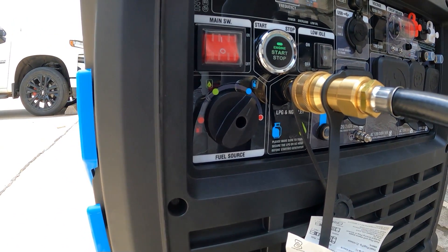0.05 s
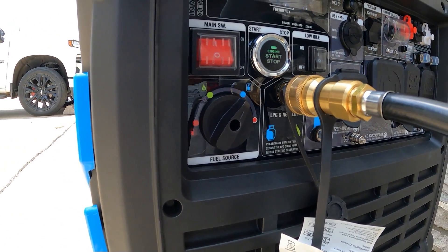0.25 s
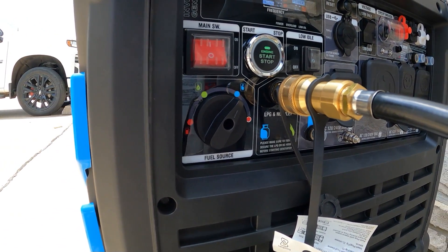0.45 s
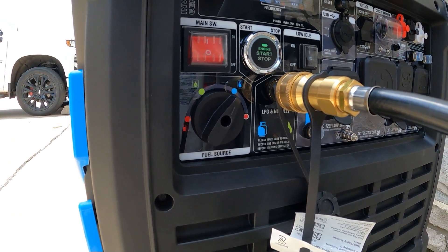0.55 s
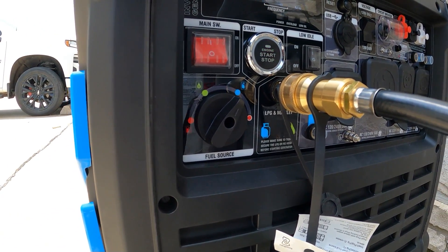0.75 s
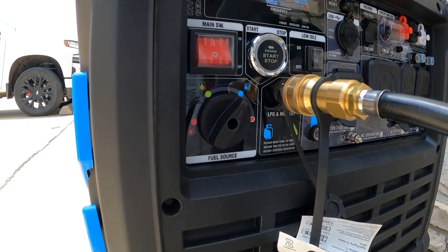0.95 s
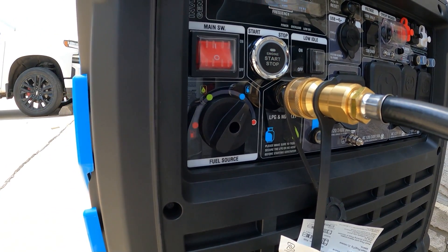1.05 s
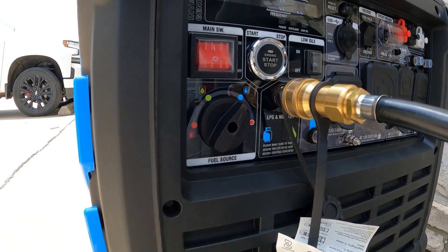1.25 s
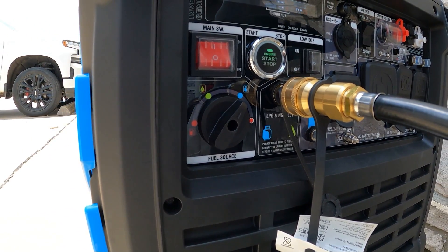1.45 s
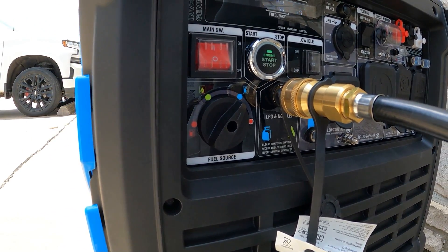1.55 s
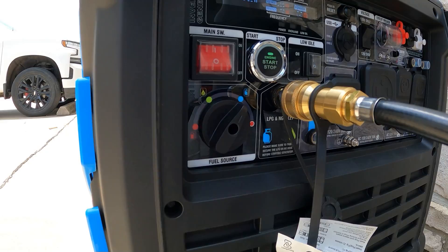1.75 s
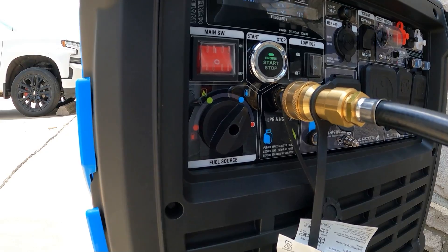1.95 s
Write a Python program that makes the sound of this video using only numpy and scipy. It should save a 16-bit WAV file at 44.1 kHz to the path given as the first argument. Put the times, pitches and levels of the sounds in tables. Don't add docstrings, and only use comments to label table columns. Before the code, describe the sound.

Faint hiss until about 0.22 s, then a loud metallic clunk with short chatter. An electric starter growls slowly from 0.3 s, its coarse gear whine rising quickly until 0.7 s and levelling by 1 s. Each compression drags it, ending in a soft low thump, roughly every 0.2 s. From 1.45 s the grinding eases, fading towards 2 s without the engine catching. Close, dry, right side only.

```python
import sys
import numpy as np
from scipy import signal
from scipy.fft import rfft, irfft
from scipy.io import wavfile

SR = 44100
rng = np.random.default_rng(int(sys.argv[2]) if len(sys.argv) > 2 else 0)


def amplitude_ratio(level_db):
    exponent = np.asarray(level_db, float) / 20
    return 10 ** exponent


def persist_wave(psi):
    counts = np.round(np.clip(psi, -1, 1) * 32767).astype(np.int16)
    wavfile.write(sys.argv[1], SR, np.atleast_2d(counts).T)


N = 88200

# t/s, level/dB, f/Hz
THUMPS = [
    (0.406, -25.5, 98.6),
    (0.671, -26.5, 104.8),
    (0.887, -25.5, 103.4),
    (1.095, -25.5, 107.2),
    (1.299, -25.5, 104.7),
    (1.5, -26, 106),
    (1.703, -27.5, 107.6),
    (1.903, -29.5, 106),
]
# f/Hz, bandwidth/Hz, level/dB, change once the strain eases/dB
PANELS = [(65, 30, -22, 1), (265.5, 71, -11, 11.5), (490, 47, -31, 8), (551.4, 26, -11.5, -13),
          (684, 46, -5, -7), (732, 66.6, 0, 1.5), (841.3, 40.5, -1, 3)]
# f/Hz, bandwidth/Hz, level/dB, change once the strain eases/dB
HOUSING = [(196.2, 3.97, -1.5, 11), (1127.5, 43, -0.5, 8), (1201, 36, -4.5, 6.5), (1290, 22, -5, -12),
           (1529, 26, -2, -10.5), (1750, 100, -12, 2.5), (2361.5, 32, 1.5, 1.5), (2469, 79, -1.5, 2.5),
           (3054, 52, -10, -26), (3515, 75, 2, 5), (3567, 114, -1.5, 5), (4360, 86, -4, -5.5),
           (5240, 148, -7.5, 5)]
# t/s, level/dB, brightness/dB
BLOWS = [(.216, -35, -2), (0.2238, -22, -7), (0.2272, -12.5, -8), (0.2305, -13.5, -10), (0.2338, -14, 8.5),
         (.2357, -1, -9), (0.2406, -5, -10), (0.2463, -13, -12), (.253, -17.5, -9), (0.26, -16.5, -34),
         (0.2663, -20.5, -33), (.271, -16, -41), (0.283, -20, -46), (0.299, -22, -24), (.315, -24, -31)]


def starter():
    # t/s, mesh f/Hz, effort level/dB, panel level/dB, whine level/dB
    run_up = [(0.301, 284.7, -40, -31, -64), (.333, 290.2, -33.5, -51, -34.5),
              (.395, 298.2, -32, -42, -34.5), (.42, 332, -31.5, -43, -44), (.456, 394.1, -30.5, -36, -32),
              (.5, 434.6, -31.5, -30.5, -27), (.568, 494.2, -27.5, -31.5, -27),
              (.64, 516.1, -27, -24, -31.5), (.71, 536.6, -27, -37.5, -25.5),
              (.8, 561.9, -27.5, -26.5, -32), (1.0, 596.6, -26, -29.5, -34.5),
              (1.2, 605.6, -26.5, -25.5, -38.5), (1.33, 610, -26.5, -30, -35.5), (1.45, 615, -28, -28, -32),
              (1.5, 606.4, -30.5, -42, -38.5), (1.6, 606.8, -31.5, -47.5, -36.5),
              (1.8, 615, -34.5, -45.5, -39), (2.0, 620, -40.5, -52.5, -42.5)]
    # f/Hz, bandwidth/Hz, level/dB, change once the strain eases/dB
    casing = [(5896, 77, -13.5, 5), (6425, 130, -15.5, 3.5), (6730, 120, -29, 12), (6980, 75, -14, 4.5),
              (7650, 650, -23, 3), (8370, 400, -38, 4), (10900, 520, -26.5, -8)]
    t = np.arange(N) / SR
    s, *rows = np.transpose(run_up)
    mesh, effort_db, panel_db, whine_db = (np.interp(t, s, row) for row in rows)
    press, slack = compression(t)
    speed = mesh * (1 - .085 * press) * (1 + .004 * drift(per_s=40))
    turns = np.cumsum(speed) / SR
    shaft = np.cos(2 * np.pi * turns / 8)
    slow = np.clip(1 - (t - 0.35) / 0.14, 0, 1)
    eased = np.clip((t - 1.461) / 0.07, 0, 1)

    whine = gear_whine(mesh, turns) * amplitude_ratio(whine_db + 0.44 * shaft + 2.7 * press - 2.4 * slack)
    knocks = tooth_knocks(turns, shaft)
    housing = evened(body(knocks, HOUSING + casing, eased)) * amplitude_ratio(-6 * slow)
    housing *= amplitude_ratio(effort_db + 1.6 * press - 8.56 * slack)
    panels = evened(body(knocks, PANELS, eased))
    panels *= amplitude_ratio(panel_db + 4.5 * press - 0.84 * slack)
    fizz = brush_fizz(slow, eased, press, slack) * amplitude_ratio(effort_db)
    onset = np.clip((t - .225) / 0.0071, 0, 1)
    return np.sqrt(2) * onset * (housing + panels + fizz + whine)


def compression(t):
    at = np.array(THUMPS)[:, 0]
    at = np.r_[at[0] - .33, at, 2 * at[-1] - at[-2]]
    left = 1 - np.interp(t, at, np.arange(len(at))) % 1
    press = np.exp(-((left - .28) / .06) ** 2)
    slack = np.exp(-((left - 0.19) / 0.038) ** 2)
    return press, slack


def gear_whine(mesh, turns):
    # multiple of mesh, level/dB, level through resonances/dB, climb/(dB/octave), wander/dB
    orders = [(.312, -59, 2, 52, 2.5), (1, -3, -18, 8.5, 3.5), (1.5, -36, 0, -23, 3), (2, -47, -36, 0, 12),
              (3, -14, -4, -5, 6.5), (4.5, -10, 3, -15, 3),
              (9, -29, -24, -22, 4), (13.5, -30, -26, -20, 4), (18, -35, -30, -18, 4),
                 (22.5, -38, -30, -23, 4)]
    whine = np.zeros(N)
    for k, db, ring_db, climb_db, wander_db in orders:
        response = 0
        for n, (f, width, level_db, _) in enumerate(PANELS + HOUSING):
            response = response + (-1) ** n * amplitude_ratio(level_db) / (1 + 2j * (k * mesh - f) / (0.65 * width))
        level = amplitude_ratio(db) + amplitude_ratio(ring_db) * abs(response)
        level = level * amplitude_ratio(climb_db * np.log2(mesh / 540) + wander_db * drift(per_s=22))
        jitter = min(k, 7) * 0.027 * drift(per_s=91)
        whine += level * np.cos(2 * np.pi * (k * turns + jitter + rng.random()))
    return whine


def tooth_knocks(turns, shaft):
    teeth = np.diff(np.floor(turns + .12 * drift(per_s=300)), prepend=0) > 0
    hits = teeth | (rng.random(N) < 700 / SR)
    spread_db = 3.5 * np.minimum(rng.exponential(1, N), 4)
    knocks = evened(hits * rng.choice([-1., 1.], N) * amplitude_ratio(spread_db))
    return (knocks + 0.85 * rng.standard_normal(N)) * amplitude_ratio(1.44 * shaft)


def brush_fizz(slow, eased, press, slack):
    # f/Hz, level/(dB/Hz)
    strained_bands = [(24, -22), (40, 5), (577, -10.5), (637, -28), (838, -5), (2060, -13.5), (2390, -7),
                      (5170, -19.5), (15500, -30.5)]
    # f/Hz, level/(dB/Hz)
    slow_bands = [(24, -52), (40, -15), (143, 10.5), (973, -18.5), (1280, 1.5), (1450, -13.5),
                  (2390, -13.5), (15500, -43)]
    # f/Hz, level/(dB/Hz)
    eased_bands = [(24, -54), (40, 1), (192, 3), (472, -20.5), (606, -9.5), (1130, -14), (2160, -20),
                   (3560, -16), (15500, -41)]
    brush = np.sqrt(np.maximum(1 - slow - eased, 0)) * coloured(strained_bands)
    brush += amplitude_ratio(10.0) * np.sqrt(slow) * coloured(slow_bands)
    brush += amplitude_ratio(2.5) * np.sqrt(eased) * coloured(eased_bands)
    low = signal.butter(2, 282, fs=SR, output="sos")
    rumble = signal.sosfilt(low, brush) * amplitude_ratio(-9.5 + 10 * press)
    flicker_db = 1.1 * drift(per_s=64) + 0.69 * drift(per_s=1900)
    return (clumped(brush, depth_db=2.0) + rumble) * amplitude_ratio(-5.5 + flicker_db + 0.74 * press - 2 * slack)


def body(x, modes, eased):
    out = np.zeros(N)
    for k, (hz, width, db, late_db) in enumerate(modes):
        level_db = db + late_db * eased + flare_db(hz) + 1.7 * drift(per_s=22)
        out += (-1) ** k * amplitude_ratio(level_db) * ring(x, hz, width)
    return out


def flare_db(hz):
    # t/s, duration/s, f/Hz, level change/dB
    flares = [(.44, 0.037, 2354, 11.5), (0.66, 0.12, 2380, 8), (0.81, 0.058, 2400, 8.5),
              (0.87, 0.047, 2440, 4), (1.04, 0.039, 2400, -2), (1.07, 0.038, 2440, -2),
              (1.422, 0.049, 2440, 10.5), (1.5, 0.041, 2420, 8.5), (1.72, 0.055, 2440, 4),
              (.435, 0.085, 3520, 9), (0.56, 0.035, 3530, 4), (0.92, 0.1, 3520, 4.5), (1.1, 0.056, 3520, 4),
              (1.185, 0.053, 3520, 1.5), (1.256, 0.053, 3520, 2.5), (1.1, 0.027, 3520, 6.5),
              (1.413, 0.03, 3520, 3), (1.487, 0.058, 3520, 5), (1.623, .034, 3520, 0.5),
              (1.703, 0.031, 3520, 4), (0.53, 0.042, 4388, 4.5), (0.63, 0.036, 4388, 5),
              (0.8, 0.041, 4388, 5), (0.97, 0.034, 4388, -2), (1.05, 0.04, 4388, 3),
              (1.184, 0.039, 4388, 7.5), (0.754, 0.03, 5227, 10), (1.063, 0.031, 5227, 6.5),
              (0.67, 0.023, 5227, 4.5), (1.284, 0.022, 5227, 6), (1.53, .025, 5227, 7),
              (0.536, .03, 3043, 18.5), (0.414, 0.032, 1135, 16), (0.751, 0.031, 1135, 6.5),
              (1.5, 0.088, 1135, 0.5), (0.35, 0.067, 700, 10), (0.54, 0.069, 733, 8),
              (0.807, 0.038, 843, 5), (1.03, 0.04, 843, 8), (1.27, 0.032, 733, 5), (0.889, 0.051, 843, 5),
              (.81, 0.038, 552, 13), (1.2, 0.029, 552, 13), (1.235, 0.024, 552, 4), (1.435, 0.032, 552, 10),
              (1.235, 0.033, 843, 7.5), (1.43, 0.039, 7020, 11.5), (0.691, .03, 5300, -10)]
    t, out = np.arange(N) / SR, np.zeros(N)
    for s, length, f, db in flares:
        if abs(f / hz - 1) < .035:
            out += db * np.exp(-((t - s - length / 2) / (length / 2)) ** 4)
    return out


def clunk():
    # f/Hz, level/dB, t60/s
    modes = [(141.4, -10, 0.25), (217, -8, 0.095), (332, -13, 0.11), (528, -1.5, 0.055),
             (681.7, -2.5, 0.09), (836, 5.5, 0.051), (1030, 8, 0.014), (1516, -5, 0.042),
             (2343, -7.5, 0.045), (2890, -9.5, 0.039), (3730, -9.5, 0.037), (6370, -21, 0.091),
             (7540, -24, 0.035), (11000, -26.5, 0.035)]
    out, t = np.zeros(N), np.arange(SR // 2) / SR
    for s, db, bright_db in BLOWS:
        sound = np.zeros(len(t))
        for (f, mode_db, t60), luck in zip(modes, rng.standard_normal(len(modes))):
            tilt_db = 0.084 * bright_db * np.log2(f / 850)
            level = amplitude_ratio(mode_db + 3.8 * luck + tilt_db - 60 * t / t60)
            sound += level * np.sin(2 * np.pi * f * (1 + .02 * luck) * t)
        crack = signal.lfilter([.35], [1, -.65], rng.standard_normal(len(t)))
        crack *= amplitude_ratio(bright_db - 60 * t / 0.069)
        out[round(s * SR):][:len(t)] += amplitude_ratio(db - 4.5) * np.minimum(t / 0.0012, 1) * (sound + crack)
    return signal.sosfilt(signal.butter(4, 105, "high", fs=SR, output="sos"), out)


def exhaust():
    out, t = np.zeros(N), np.arange(SR // 4) / SR
    for s, db, hz in THUMPS:
        overtone = .35 * np.sin(2 * np.pi * 1.66 * hz * t) * amplitude_ratio(-60 * t / 0.27)
        swing = -np.sin(2 * np.pi * hz * t) - overtone
        push = -.15 * (1 - t / 0.0029) * np.exp(-t / 0.011)
        envelope = amplitude_ratio(db + 8 - 60 * (t / .085) ** 1.52) * np.minimum(t / .005, 1)
        part = out[round((s - .004) * SR):][:len(t)]
        part += (envelope * (swing + push))[:len(part)]
    return out


def input_hiss():
    # f/Hz, level/(dB/Hz)
    floor = [(15, 7.5), (60, -10), (300, -16.5), (1500, -24), (6000, -27), (15000, -31)]
    return amplitude_ratio(-65.5) * np.array([coloured(floor), coloured(floor)])


def evened(x):
    return x / np.sqrt(np.mean(x ** 2) + 1e-20)


def coloured(points):
    f, db = np.transpose(points)
    hz = np.fft.rfftfreq(N, 1 / SR)
    gain = amplitude_ratio(np.interp(np.log(hz + 1), np.log(f + 1), db))
    return evened(irfft(rfft(rng.standard_normal(N)) * gain, N))


def drift(per_s):
    hz = np.fft.rfftfreq(N // 20, 20 / SR)
    lowpass = (hz > 0) / (1 + (hz / per_s) ** 4)
    slow = irfft(rfft(rng.standard_normal(N // 20)) * lowpass, N // 20)
    return np.interp(np.arange(N) / 20, np.arange(N // 20), evened(slow))


def ring(x, hz, width):
    return signal.lfilter(*signal.iirpeak(hz, hz / width, SR), x)


def clumped(x, depth_db):
    edges = np.geomspace(300, 19000, num=9)
    out = np.zeros(N)
    for k, pair in enumerate(zip(edges, edges[1:])):
        band = signal.sosfilt(signal.butter(2, pair, "band", fs=SR, output="sos"), x)
        out += (-1) ** k * band * amplitude_ratio(depth_db * drift(per_s=64))
    return out


def scene():
    high_pass = signal.butter(2, 55, "high", fs=SR, output="sos")
    machine = signal.sosfilt(high_pass, starter() + clunk() + exhaust())
    return np.array([np.zeros(N), machine])


def band_limit(x):
    return signal.sosfilt(signal.butter(12, 15850, fs=SR, output="sos"), x)


def record(dry):
    since = np.arange(N) / SR - BLOWS[2][0]
    duck = amplitude_ratio(-4 * (since > 0) * np.exp(-abs(since) / .25))
    mix = np.clip(dry + duck * input_hiss(), -.96, .96)
    return band_limit(mix)


dry = scene()
out = record(dry)
persist_wave(out)
```